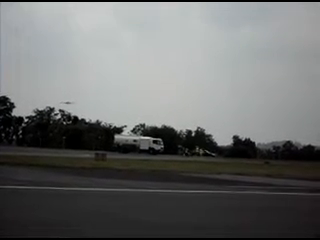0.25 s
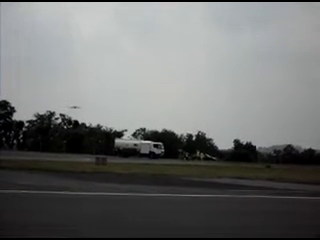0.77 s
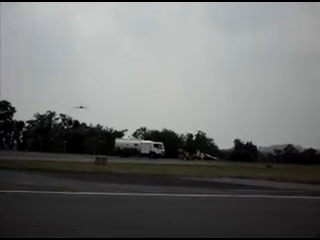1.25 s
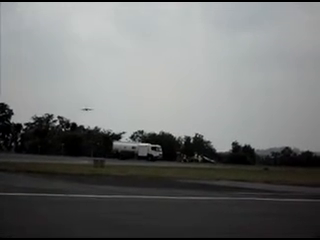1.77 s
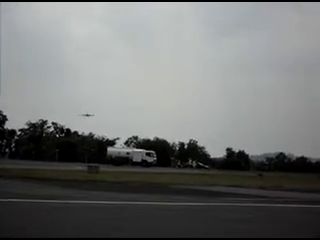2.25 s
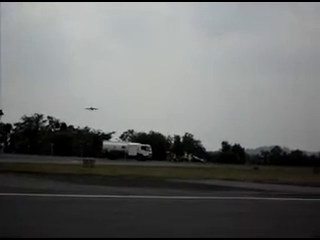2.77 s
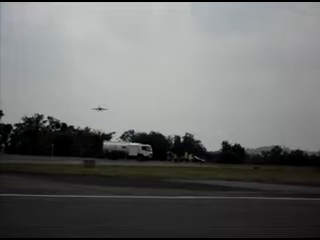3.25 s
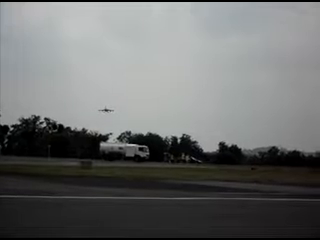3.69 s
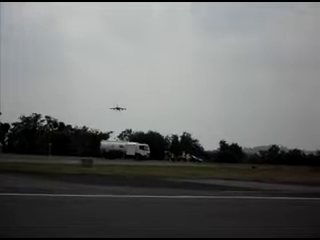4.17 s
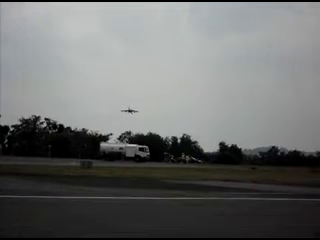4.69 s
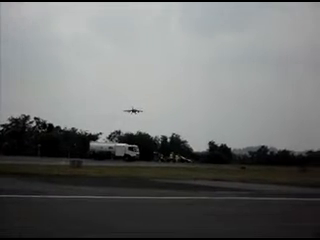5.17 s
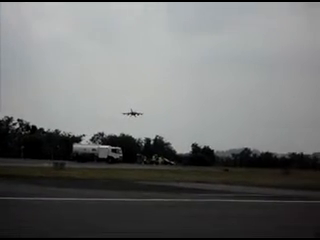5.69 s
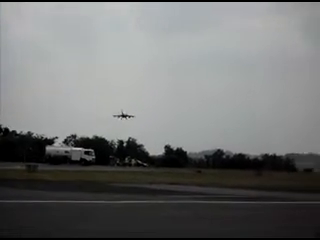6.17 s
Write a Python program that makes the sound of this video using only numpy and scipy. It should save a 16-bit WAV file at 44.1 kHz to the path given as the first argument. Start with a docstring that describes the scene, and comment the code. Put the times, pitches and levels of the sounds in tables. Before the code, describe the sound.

For about 6.4 seconds, jet engines roar steadily across an open airfield, loud from the first instant and cut off while still running. The sound is a dense, turbulent wall: deep exhaust rumble, broad hollow mid roar, and a rushing, slightly fluttering hiss above. A low, unsteady hum surges inside the rumble, briefly around 0.5 and 1 second, then again near 3, 3.8 and 5 seconds. Thin compressor tones waver faintly within the noise; the higher ones sink into the hiss after about 4 seconds, while a lower whine grows somewhat clearer around 5.2. Overall loudness stays nearly even, a touch stronger from 5.8 to the end. A small camera microphone gives a mono, narrow, gritty sound with clipped peaks and little extreme treble. Barely audible ticks fall near 3.3, 5.8 and 6.3 seconds.

```python
"""Jet engines across an airfield

Engines run steadily at a distance: exhaust rumble with a surging drone, mid roar and intake hiss are shaped
noise, their spectral valleys cut by echoes off the tarmac; the compressor whine is a set of wavering sines.
The microphone of a small camera samples slowly, so the top of the hiss is mirrored above half its
sampling rate; the loudest peaks clip. A thin hiss lies around the upper band edge, a few faint ticks above."""
import sys
import numpy as np
from scipy import signal
from scipy.fft import rfft, irfft, next_fast_len
from scipy.io import wavfile
from scipy.ndimage import uniform_filter1d, map_coordinates

SR = 44100
rng = np.random.default_rng(int(sys.argv[2]) if len(sys.argv) > 2 else 0)


def pcm_store(signal):
    """Save signal as 16-bit PCM."""
    levels = np.round(np.clip(np.atleast_2d(signal), -1, 1) * 32767)
    wavfile.write(sys.argv[1], SR, levels.astype(np.int16).T)


N = 284004  # samples, 6.44 s

# Noise spectra of the engines, low to high, valleys included: (f/Hz, relative density level/dB per Hz)
RUMBLE_SPECTRUM = [(8, -46), (15, -23), (43, -8), (70, -9), (105, -7), (130, -2), (157, -3), (190, -4),
                   (215, -3.5), (245, -4.5), (275, -8.5), (300, -9), (330, -12.5), (370, -16.5), (440, -21),
                   (520, -42.5), (900, -120)]
ROAR_SPECTRUM = [(250, -59.5), (400, -15), (480, -10), (525, -4), (570, -3.5), (620, 0), (650, -1.5),
                 (700, -1.5), (790, 1), (870, -3), (980, -11.5), (1080, -6.5), (1240, -7.5), (1370, -9),
                 (1520, -16), (1700, -39), (3000, -120)]
HISS_SPECTRUM = [(900, -63), (1450, -17.5), (1600, -6.5), (1800, -1.5), (2080, 0.5), (2200, -1), (2370, -6),
                 (2590, -4), (2900, -10), (3100, -4.5), (3280, -3), (3600, -6.5), (3900, -27), (6000, -120)]
FIZZ_SPECTRUM = [(2500, -63.5), (3500, -12.5), (3750, 1), (4150, 0.5), (4450, -1), (4800, -2), (4930, -3),
                 (4975, 2), (5060, 1), (5150, 2), (5350, -4.5), (5512, -13.5), (5600, -60), (9000, -120)]
# Rms levels before swell, drift and flutter; the whine's is the reference of its tones
RUMBLE_DB, ROAR_DB, HISS_DB, FIZZ_DB, WHINE_DB = -20.5, -19.5, -24.5, -26.5, -36

# Swell about the steady levels: (t/s, roar level/dB, rumble level/dB, treble level/dB, whine level/dB)
SWELL = [(0, -1.6, -0.5, -0.5, -1), (.4, 0.2, -0.5, 0.6, -1.5), (.97, -1, 1, 0, -3),
         (1.1, -0.5, -.5, 0.1, -1), (1.6, -0.2, -1.5, 0, 1), (2.2, -1, -0.5, -1, 0.5),
         (2.7, -1, -0.5, -0.2, -3), (3.2, -0.7, .2, -0.1, -1.5), (3.9, -1, 0, -0.3, 1),
         (4.5, 0, -.3, -1.1, -4.5), (5.2, -0.5, -1.6, 0, 5.5), (5.8, 0.8, 0.2, 0.3, 1.5),
         (6.44, 0.5, -1, 1.3, 4)]
# Swell of the topmost hiss about its steady level: (t/s, level/dB)
FIZZ_SWELL = [(0, -.5), (.5, 1), (1, 0.5), (1.6, .3), (2.4, -.7), (3.1, 0.3), (3.7, 0.2), (4.3, -1),
              (5, 0.1), (5.7, 0), (6.44, 0.3)]
# Slow wander of each noise layer: scale/dB, random knots per second
DRIFT_DB, DRIFT_PER_S = 0.37, 3.645

# Droning core of the rumble, surging: (t/s, rms level/dB before flutter)
DRONE_LEVEL = [(0, -44), (.45, -25.5), (.85, -36), (.99, -22), (1.1, -38.5), (1.6, -26.5), (1.9, -34),
               (2.5, -30.5), (3.0, -23.5), (3.5, -32), (3.8, -23), (4.3, -25.5), (4.6, -28.5), (5.0, -22),
               (5.35, -27), (5.7, -25), (6.44, -31.5)]
DRONE_HZ, DRONE_WAVER_HZ, DRONE_WAVERS_PER_S = 155.3, 14.06, 30

# Centre pitches of the compressor tones: (f/Hz)
TONE_HZ = [530, 631, 1261, 2528, 4975]
# One row per tone: (level/dB re whine, pitch waver f/Hz, level waver/dB,
# growth/dB per dB of whine swell, share of the late fade/1)
TONE_BEHAVIOUR = [(-2.5, 4.02, 2.5, -0.5, 0.017), (-2.5, 6, 1.5, 0, 0), (0, 2.5, 2.5, 1, 0.064),
                  (-4.5, 2, 1.5, -0.5, 1), (-7.5, 13, 3, 0, 0.45)]
# The upper tones sink into the hiss: (t/s, level/dB)
LATE_FADE = [(0, 0), (2.2, 0.5), (4.1, -2), (4.9, -6), (6.44, -8)]

# Soft playback filter of the camera: (f/Hz, gain level/dB)
PLAYBACK_RESPONSE = [(4000, 0), (4970, -0.5), (5510, -5.5), (6050, -12), (6500, -23), (6800, -36.5),
                     (7000, -40), (7130, -49.5)]
SKIP = 4  # keep one sample in four: 11025 Hz
CLIP_LEVEL, TOP_HZ, FULL_BAND_HZ = 0.71, 7127, 15700  # peak limit; edges of playback and of the full band
# Spectrum of a thin hiss around the upper band edge: (f/Hz, relative density level/dB per Hz)
EDGE_HISS_SPECTRUM = [(4500, -61), (5200, -7), (5500, -2), (5900, -11), (6800, -29), (7300, -39.5),
                      (7700, -52), (8200, -120)]
EDGE_HISS_DB = -50.5  # rms level
# Faint treble ticks: (t/s, impulse level/dB before the tick filter)
TICKS = [(3.3342, -21), (5.7976, -30.5), (5.8026, -32.5), (6.2929, -22)]


def amp(db):
    """Turn a level in dB into an amplitude factor."""
    return 10 ** (np.asarray(db) / 20)


def unit(x):
    """Scale a signal to rms 1."""
    return x / np.sqrt(np.mean(x ** 2) + 1e-20)


def along(points, hz):
    """Read a (f/Hz, value) table on a log frequency axis."""
    f, values = np.transpose(points)
    return np.interp(np.log(hz + 1), np.log(f + 1), values)


def curves(rows):
    """Give one curve, a value per sample, for each column after the time."""
    t, *columns = np.transpose(rows)
    return [np.interp(np.arange(N) / SR, t, column) for column in columns]


def wobble(rate):
    """Join normal random knots, rate of them a second, by a smooth curve."""
    knots = rng.standard_normal(N // 100)
    return map_coordinates(knots, [np.arange(N) * rate / SR])


def drift():
    """Wander slowly and randomly in level, dB."""
    return DRIFT_DB * wobble(DRIFT_PER_S)


def filtered(x, response):
    """Multiply the spectrum of x by a response of frequency."""
    size = next_fast_len(N + 8192)  # padded against wrap-around
    spectrum = rfft(x, size) * response(np.fft.rfftfreq(size, 1 / SR))
    return irfft(spectrum, size)[..., :N]


def rush(spectrum, patchy_db):
    """Noise of rms 1 with patches of random gain, as turbulent air scatters it."""
    cells = signal.stft(rng.standard_normal(N), nperseg=512)[2]
    patches = rng.standard_normal(cells.shape)
    for axis in (0, 1):  # blur over frequency, then time
        patches = uniform_filter1d(patches, size=5, axis=axis)
    patchy = cells * amp(patchy_db * unit(patches))
    noise = signal.istft(patchy, nperseg=512)[1][:N]
    return unit(filtered(noise, lambda hz: amp(along(spectrum, hz))))


def edge_hiss():
    """Thin, patchy noise from about 5 to 7.7 kHz."""
    return amp(EDGE_HISS_DB) * rush(EDGE_HISS_SPECTRUM, patchy_db=3)


def ticks():
    """Single-sample impulses, broadband, heard only above the band of the roar."""
    impulses = np.zeros(N)
    for t, db in TICKS:
        impulses[round(t * SR)] = amp(db)

    def treble(hz):
        rise = np.clip((hz - 5500) / 1500, 0, 1)
        tilt = amp(-8 * hz / FULL_BAND_HZ)
        return rise * tilt

    return filtered(impulses, treble)


def compressor():
    """Blade tones that waver in pitch and fade in and out through the moving air."""
    whine = np.zeros(N)
    swell_db = curves(SWELL)[-1]
    fade_db = curves(LATE_FADE)[0]
    for hz, (db, waver_hz, waver_db, grows, fades) in zip(TONE_HZ, TONE_BEHAVIOUR):
        turns = np.cumsum(hz + waver_hz * wobble(14)) / SR
        level_db = db + grows * swell_db + fades * fade_db + waver_db * wobble(9)
        whine += np.sqrt(2) * amp(level_db) * np.sin(2 * np.pi * turns)
    return amp(WHINE_DB) * whine


def drone():
    """A low hum inside the rumble: a sine of unsteady pitch, surging on its own."""
    turns = np.cumsum(DRONE_HZ + DRONE_WAVER_HZ * wobble(DRONE_WAVERS_PER_S)) / SR
    level_db = curves(DRONE_LEVEL)[0] + 2.2 * wobble(18)
    return np.sqrt(2) * amp(level_db) * np.sin(2 * np.pi * turns)


def jets():
    """Big eddies rumble, smaller ones roar, the intake hisses; the topmost hiss flutters on its way."""
    roar_db, rumble_db, treble_db, _ = curves(SWELL)
    flutter_db = 0.8 * wobble(60)
    fizz_db = curves(FIZZ_SWELL)[0] + flutter_db
    rumble = amp(RUMBLE_DB + rumble_db + drift()) * rush(RUMBLE_SPECTRUM, patchy_db=0.2)
    roar = amp(ROAR_DB + roar_db + drift()) * rush(ROAR_SPECTRUM, patchy_db=0.9)
    hiss = amp(HISS_DB + treble_db + drift()) * rush(HISS_SPECTRUM, patchy_db=0.5)
    fizz = amp(FIZZ_DB + fizz_db + drift()) * rush(FIZZ_SPECTRUM, patchy_db=0.12)
    return rumble + roar + hiss + fizz


def scene():
    """The airfield as it reaches the microphone, one channel."""
    return (compressor() + drone() + jets())[None]


def record(dry):
    """Clip the peaks and sample slowly: the soft playback filter lets a mirror image through."""
    sparse = np.zeros_like(dry)
    kept = np.clip(dry[:, ::SKIP], -CLIP_LEVEL, CLIP_LEVEL)
    sparse[:, ::SKIP] = SKIP * kept  # makes up for the zeros between
    smooth = filtered(sparse, lambda hz: amp(along(PLAYBACK_RESPONSE, hz)) * (hz < TOP_HZ))
    return filtered(smooth + edge_hiss() + ticks(), lambda hz: hz < FULL_BAND_HZ)


dry = scene()
out = record(dry)
pcm_store(out)
```